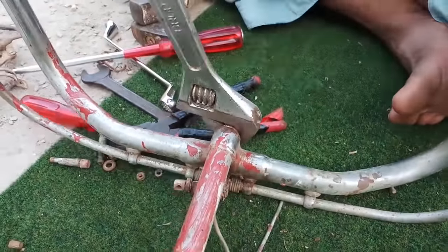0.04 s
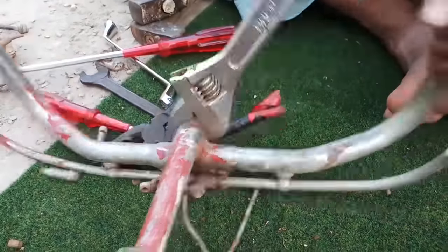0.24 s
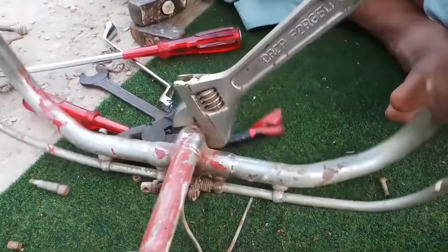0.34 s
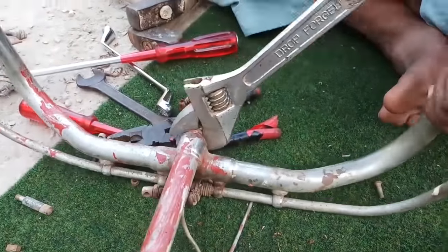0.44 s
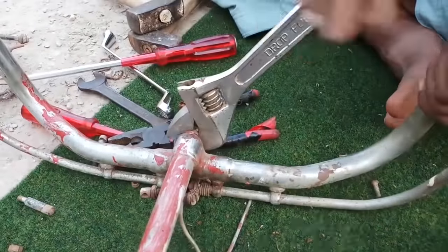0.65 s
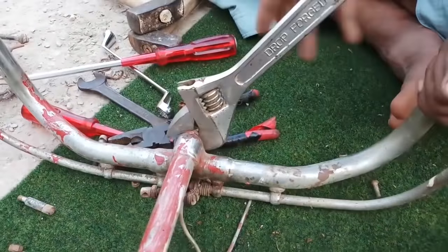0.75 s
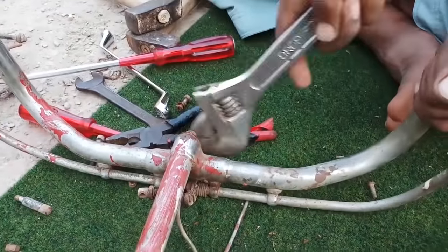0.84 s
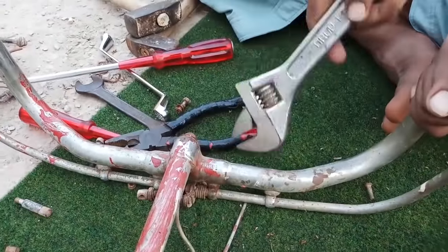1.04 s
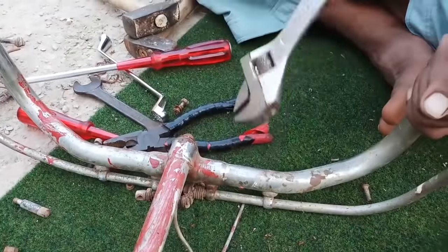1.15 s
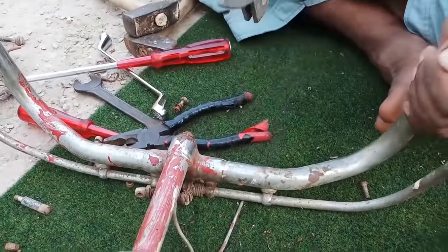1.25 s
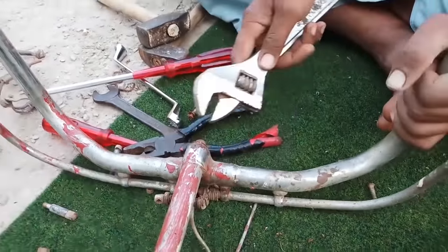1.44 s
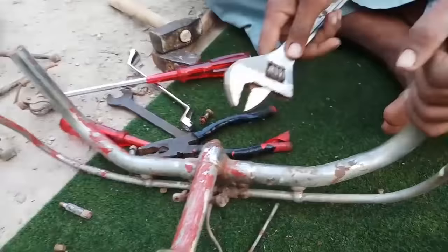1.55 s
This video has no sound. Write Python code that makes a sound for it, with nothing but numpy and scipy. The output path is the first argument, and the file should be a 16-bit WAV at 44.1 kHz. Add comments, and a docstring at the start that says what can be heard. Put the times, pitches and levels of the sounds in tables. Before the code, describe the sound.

Close up outdoors, an adjustable wrench clatters and grinds against a metal bicycle frame, then knocks with a fading buzz. Sharp jaw clicks come next, then a small tick and soft taps as it lifts away.

```python
"""A steel adjustable wrench slips on a bicycle frame lying on the ground, heard close up outdoors.
First the frame thumps on the turf while the wrench clatters, grinds and rings until a hand damps it.
Set back on the tube, the wrench knocks and leaves a fading metallic buzz. Then its loose jaw clicks.
Last, its screw ticks and it is lifted away with a scrape and a few light taps.
A faint low rumble and hiss lie under it all."""
import sys
import numpy as np
from scipy import signal
from scipy.fft import rfft, irfft
from scipy.io import wavfile
from scipy.ndimage import uniform_filter1d, map_coordinates

SR = 44100
rng = np.random.default_rng(int(sys.argv[2]) if len(sys.argv) > 2 else 0)


def generate_wav(sig):
    """Save sig (samples, or channels by samples) to the path in sys.argv[1] as 16-bit PCM at SR."""
    pcm = np.round(np.clip(np.atleast_2d(sig).T, -1, 1) * 32767).astype(np.int16)
    wavfile.write(sys.argv[1], SR, pcm)


N = 70560
TOP_HZ, TILT_TOP_HZ = 15750, 6500  # top of the sound; where a frame hit's tilt levels off
# Below, t60 is the time to fade by 60 dB, and a higher tilt makes a sound brighter.
# tone colour of steel hitting the frame: f/Hz, level/dB
HIT_COLOUR = [(100, -19.5), (380, -6), (750, -4), (1000, 0), (1300, 3.5), (1650, -7.5), (2200, -0.5),
              (2900, -2), (3400, 2), (4000, -3.5), (4800, 2.5), (6000, -0.5), (7200, -6.5), (8200, 0),
              (11000, -7.5), (14500, -6), (16000, -14.5)]


def clatter():
    """Each hit of the wrench gives a crack and a short ping; the frame rings on."""
    # wrench hitting the frame: t/s, level/dB, tilt/(dB per octave), t60/s, ping f/Hz
    hits = [(.2238, -7.5, -6, 0.03, 724), (.2325, -14.5, .5, 0.11, 2213), (.2408, -11.5, 5, 0.031, 5010),
            (.2462, -10.5, 5.5, 0.062, 4680), (.2532, -12.5, 3.5, .024, 10030),
            (.257, -26, -0.9, .19, 4046), (.2992, -19.5, 0, .034, 3300), (.3162, -20.5, 1, .035, 2460),
            (.3268, -27.5, -2, 0.051, 3540), (.3565, -28.5, 1.5, 0.032, 8320),
            (.3605, -16.5, 18, 0.033, 5506), (.3722, -28, 6, 0.022, 8300),
            (0.3775, -25.5, 8.5, 0.022, 6800), (.401, -41, 4, 0.065, 8350), (.4412, -43.5, -5, 0.063, 2090)]
    # the frame's ringing tones: f/Hz, level/dB, t60/s
    frame_tones = [(2144, -9.5, .1), (4251, -2, .07), (4920, -3, .06), (4720, -2.5, .066), (5154, -2, .06),
                   (8299, -0.5, .13), (8723, -7.5, .11)]
    out = np.zeros(N)
    for start, db, tilt, t60, hz in hits:
        ping = tone(hz) * fade(min(0.033, t60)) * rise(0.00034)
        crack = burst(colour(HIT_COLOUR, tilt, TILT_TOP_HZ), t60)
        swell = rise(.00015 * amp(0.91 * (-12 - db)))  # weak, glancing hits start more softly
        add(out, start, amp(db) * swell * (crack + ping))
    add(out, .2412, amp(-19) * ring(frame_tones))
    return out


def clinks():
    """The wrench rings, wavering a little, until the hand damps it, the low tones first."""
    # hits that set it ringing: t/s, level/dB, spot (0 head, 1 handle), time until damped/s
    hits = [(0.253, -16.5, 0.013, .104), (0.3609, -17, 1, 0.03), (1.571, -55, 0.44, .05)]
    # the wrench's own tones: f/Hz, t60/s, level hit on the head/dB, level hit on the handle/dB
    wrench_tones = [(1145, .59, -22, -34.5), (2620, .46, -22, -30.5), (3914, .067, -.5, -30.5),
                    (5495, .37, -2, -5), (6395, .4, -25, -37), (7171, .25, -20.5, -32.5),
                    (8180, .17, -7.5, -28.5), (8875, .2, -16.5, -28), (9470, .24, 0, 0.5),
                    (10060, .24, -10.5, 0.5), (14680, .17, -9.5, -10)]
    out = np.zeros(N)
    for start, db, spot, free_s in hits:
        firm_grip = fade(0.033, after=free_s + 0.068)  # stops every tone
        for hz, t60, head_db, handle_db in wrench_tones:
            gain = amp(db + head_db + spot * (handle_db - head_db))
            damping = fade(0.038 * np.clip(hz / 5500, 1, 1.8) ** 2.6, after=free_s)
            add(out, start, gain * tone(hz) * fade(t60) * waver() * damping * firm_grip)
    return out


def jaw():
    """The loose jaw clicks: a crack, a short ring and a faint after-ring. It is too small to make bass."""
    # jaw clicks: t/s, level/dB, crack tilt/(dB per octave), crack t60/s, f of the spot hit/Hz
    clicks = [(.832, -39.5, -14.5, 0.033, 3460), (.8467, -29, -3.5, 0.01, 7900),
              (.8575, -37.5, 4.5, .05, 10700), (.865, -37.5, -6, 0.15, 3460),
              (.8915, -36, 14.5, .025, 14230), (.9015, -7.5, 1, 0.025, 6000),
              (.9092, -14.5, -1.5, 0.047, 3100), (.925, -31, 3, 0.093, 9650), (.931, -18, 8, 0.027, 5655),
              (0.981, -43, -5.5, 0.079, 3220), (1.0024, -46, 2, .04, 3460)]
    # the jaw's short tones: f/Hz, level/dB, t60/s
    jaw_tones = [(1661, -16, 0.073), (3094, -7, .04), (3220, -13, 0.049), (3446, 4.5, 0.045),
                 (5210, -11.5, 0.042), (5694, -5, .038), (5950, -9.5, 0.026), (6615, -10, 0.0455),
                 (7940, -12.5, .03), (9560, -19.5, .04), (10700, -16.5, 0.038), (14230, -21, .05)]
    # tone colour of the crack: f/Hz, level/dB
    crack_colour = [(150, -29.5), (900, -8), (2000, -6), (3200, 12), (4400, -4), (5700, 5.5), (8000, -2.5),
                    (12000, -2.5), (14500, -7.5), (16000, -24)]
    # faint tones that linger: f/Hz, level/dB, t60/s
    lingering_tones = [(3500, -53.5, 0.39), (6403, -40.5, 0.46), (6800, -32, .18), (7150, -39, .2),
                       (8830, -41, .27)]
    out = np.zeros(N)
    after_ring = ring(lingering_tones)
    for start, db, tilt, t60, spot_hz in clicks:
        crack_db = -5 + .15 * (db + 16.5)  # soft clicks have less crack and more pitch
        crack = amp(crack_db) * burst(colour(crack_colour, tilt), t60)
        add(out, start, amp(db) * (amp(-4) * struck(jaw_tones, spot_hz) + crack + after_ring))
    low_cut = signal.butter(2, 500, "high", fs=SR, output="sos")
    return signal.sosfilt(low_cut, out)


def thump():
    """The frame is shoved against the ground, and the turf soon stops it."""
    # low tones of the frame on the ground: f/Hz, relative level/dB, t60/s
    low_tones = [(66.96, -16, .13), (161, -16, 0.11), (196.26, -24.5, 0.089), (261, -21.5, 0.074)]
    out = np.zeros(N)
    add(out, .2245, 2 * ring(low_tones) * rise(0.0022) * fade(0.026, after=.016))
    return out


def tube():
    """Set back on the tube, the wrench knocks dully and leaves a fading buzz in the frame."""
    # knocks on the tube: t/s, level/dB, t60/s
    knocks = [(0.4694, -39, 0.026), (.478, -36, 0.085), (0.818, -55, .04)]
    # tone colour of a knock: f/Hz, level/dB
    knock_colour = [(80, -20), (330, 17), (550, 6.5), (750, 10.5), (1200, -13), (2050, 20.5), (2600, -11.5),
                    (4200, -5), (8000, -59)]
    # pitches at which the frame buzzes: f/Hz, width/Hz, level/dB
    buzz_peaks = [(312, 100, -8.5), (800, 160, -3), (1490, 200, -1.5), (2020, 600, 3), (2624, 190, -7.5),
                  (3107, 400, 2.5), (3960, 1500, -10), (4350, 170, 3.5), (5360, 260, -3.5), (6300, 200, -4),
                  (6990, 470, -8.5), (8300, 1500, -19.5)]
    out = np.zeros(N)
    for start, db, t60 in knocks:
        add(out, start, amp(db) * burst(colour(knock_colour), t60))
    add(out, .476, amp(-42) * resonant(buzz_peaks) * fade(0.6) * rise(0.011))
    return out


def lifting():
    """The adjusting screw settles with one bright tick, then the wrench lightly taps the frame."""
    # the screw's tones: f/Hz, level/dB
    tick_tones = [(1720, -14), (2218, -16.5), (5640, 4.5), (6563, -4.5), (7772, -2)]
    # tone colour of the screw's crack: f/Hz, level/dB
    tick_colour = [(4200, -23), (5500, -1), (8700, -15), (10000, 4.5), (12400, 1), (15000, -19)]
    # light taps: t/s, level/dB, crack tilt/(dB per octave), crack t60/s, f of the spot hit/Hz
    taps = [(1.5051, -35.5, 6, 0.026, 9800), (1.519, -37.5, -0.5, 0.012, 6300), (1.546, -54, -7, .03, 2060),
            (1.5955, -36, -2, 0.12, 5850)]
    # tones a tap sets ringing: f/Hz, level/dB, t60/s
    tap_tones = [(885, -6, .07), (2045, -2.5, 0.038), (3600, 1.5, 0.029), (3930, 0, 0.054),
                 (4670, -0.5, 0.034), (5870, -5.5, 0.031), (6470, -4, 0.024), (7171, -13.5, .1),
                 (9560, -6.5, 0.04), (10000, -7.5, 0.069)]
    out = np.zeros(N)
    tick_ring = sum(amp(db) * tone(hz) for hz, db in tick_tones) * fade(0.017) * rise(0.00052)
    tick_crack = burst(colour(tick_colour), t60=0.019)
    add(out, 1.362, amp(-29.5) * tick_ring + amp(-30) * tick_crack)
    for start, db, tilt, t60, spot_hz in taps:
        crack = burst(colour(HIT_COLOUR, tilt, TILT_TOP_HZ), t60)
        add(out, start, amp(db) * (amp(-1.5) * struck(tap_tones, spot_hz) + amp(-3) * crack))
    return out


def rubbing():
    """The frame shifts on the turf; the wrench grinds along the tube and later scrapes off it."""
    # loudness of the shifting frame: t/s, level/dB
    rub_levels = [(0, -46.5), (.04, -41.5), (.095, -36.5), (.16, -42.5), (.22, -43), (.3, -42),
                  (.35, -43.5), (.4, -66.5)]
    # its tone colour: f/Hz, level/dB
    rub_colour = [(30, -34), (75, -21), (136, -2), (274, -10), (346, -6.5), (384, -16.5), (905, -24.5),
                  (1440, -24.5), (5580, -56.5), (15000, -78.5)]
    # loudness of the grinding: t/s, level/dB
    grind_levels = [(.29, -70), (.3, -33), (.333, -34.5), (.36, -53), (.44, -66.5), (.48, -91.5)]
    # its strongest pitches: f/Hz, width/Hz, level/dB
    grind_peaks = [(830, 490, -0.5), (1150, 130, -0.5), (1710, 300, -3), (2470, 570, -2), (3400, 400, 1.5)]
    # loudness of the last scrape: t/s, level/dB
    scrape_levels = [(1.49, -98), (1.505, -57), (1.535, -64.5), (1.552, -53), (1.6, -52.5)]
    # its strongest pitches: f/Hz, width/Hz, level/dB
    scrape_peaks = [(880, 60, 0.5), (963.6, 40, -5), (1140, 31, 3), (2102, 600, -14), (5490, 8000, -20.5)]
    rub = level(rub_levels) * noise(rub_colour)
    grind = level(grind_levels) * resonant(grind_peaks)
    scrape = level(scrape_levels) * resonant(scrape_peaks)
    return rub + grind + scrape


def yard(x):
    """Short echoes from the surroundings, dull because the turf swallows their treble."""
    tail = rng.standard_normal(N) * fade(0.39) * rise(.005)
    dull = signal.butter(2, 4500, fs=SR, output="sos")
    return signal.fftconvolve(x, signal.sosfilt(dull, tail / np.linalg.norm(tail)))[:N]


def background():
    """Low outdoor rumble, a hiss that comes and goes, and two faint passing tones."""
    # tone colour of the rumble: f/Hz, level/dB
    rumble_colour = [(25, -26), (181, -4), (383, -22), (450, -13.5), (790, -26), (978, -17.5),
                     (1120, -45.5), (3350, -45), (5420, -51), (6540, -42), (15000, -79)]
    # loudness of the hiss: t/s, level/dB
    hiss_levels = [(0, -66.5), (.2, -80.5), (.8, -73.5), (.88, -54.5), (.95, -53.5), (1.04, -89.5),
                   (1.2, -82), (1.28, -72.5), (1.4, -64), (1.6, -75)]
    # its tone colour: f/Hz, level/dB
    hiss_colour = [(300, -4), (1000, 5), (2000, -0.5), (3500, -0.5), (7000, -6), (13500, -6.5),
                   (15000, -26.5)]
    # passing tones: middle t/s, f/Hz, level/dB, half length/s
    faint_tones = [(1.178, 958, -67, 0.06), (1.261, 1866, -73.5, 0.06)]
    tones = sum(amp(db) * tone(hz) * np.exp(-((clock() - middle) / half) ** 2)
                for middle, hz, db, half in faint_tones)
    return amp(-61) * noise(rumble_colour) + level(hiss_levels) * noise(hiss_colour) + tones


def burst(gain, t60):
    """A hard hit: a snap at the moment of contact, then a dense spread of pitches fading together."""
    snap = amp(1) * fade(0.0078)
    spectrum = rfft(rng.standard_normal(N) * (fade(t60) + snap))
    local_power = np.abs(uniform_filter1d(np.abs(spectrum) ** 2, size=900))
    even = spectrum / np.sqrt(local_power + 1e-12)
    x = irfft(even * gain, N) * rise(.0001) * (clock() < 3 * t60)
    return x * np.linalg.norm(fade(t60)) / np.linalg.norm(x)


def ring(tones):
    """Fading tones from rows of f/Hz, level/dB, t60/s."""
    return sum(amp(db) * tone(hz) * fade(t60) for hz, db, t60 in tones)


def struck(tones, spot_hz):
    """A ring that varies with each hit; tones near the pitch of the spot hit are louder."""
    hz, db, t60 = np.transpose(tones)
    boost_db = 10 * np.exp(-(np.log2(hz / spot_hz) / 0.14) ** 2)
    gains = amp(db + boost_db + rng.normal(0, 1, len(hz))) * rng.choice([-1, 1], len(hz))
    ringing = sum(g * tone(f) * fade(t) for g, f, t in zip(gains, hz, t60))
    return ringing * np.sqrt(2) / np.linalg.norm(gains)


def waver():
    """Grip and rubbing make a ring waver: a gain that wanders around one."""
    steps_per_s = 110
    steps = rng.standard_normal(int(N * steps_per_s / SR) + 4)
    return 1 + .13 * map_coordinates(steps, [clock() * steps_per_s])


def colour(points, tilt=0, top_hz=TOP_HZ):
    """Gain per frequency from f/Hz, level/dB points, tilted between 700 Hz and top_hz."""
    octave = np.log2(np.fft.rfftfreq(N, 1 / SR) + 1)
    hz, db = np.transpose(points)
    slope = tilt * np.clip(octave, np.log2(700), np.log2(top_hz))
    return amp(np.interp(octave, np.log2(hz), db) + slope)


def noise(points):
    """Noise of strength 1 with the given tone colour."""
    return unit(irfft(rfft(rng.standard_normal(N)) * colour(points), N))


def resonant(peaks):
    """Noise of strength 1 gathered around a few pitches."""
    f = np.fft.rfftfreq(N, 1 / SR)
    gain = sum(amp(db) / (1 + (2 * (f - hz) / width) ** 2) for hz, width, db in peaks)
    return unit(irfft(rfft(rng.standard_normal(N)) * gain / gain.max(), N))


def tone(hz):
    """A pure tone."""
    return np.sin(2 * np.pi * hz * clock())


def fade(t60, after=0):
    """Hold for `after` seconds, then fall by 60 dB every t60 seconds."""
    return np.exp(-np.log(1000) * np.maximum(clock() - after, 0) / max(t60, 1e-3))


def rise(seconds):
    """Soft start from time zero."""
    return 1 - np.exp(-clock() / seconds)


def level(points):
    """Gain curve through t/s, level/dB points."""
    return amp(np.interp(clock(), *np.transpose(points)))


def amp(db):
    """Decibels to gain."""
    return 10 ** (np.asarray(db) / 20)


def unit(x):
    """Scale x to an average strength (rms) of 1."""
    return x / np.sqrt(np.mean(x ** 2) + 1e-20)


def clock():
    """Time of every sample in seconds."""
    return np.arange(N) / SR


def add(out, start, x):
    """Mix x into out from `start` seconds on."""
    i = max(0, round(start * SR))
    out[i:] += x[:max(0, N - i)]


def scene():
    """All sources in one channel; the metal sounds get a weak echo."""
    metal = clatter() + clinks() + jaw() + tube() + lifting()
    return (metal + amp(-36.5) * yard(metal) + thump() + rubbing() + background())[None]


def record(dry):
    """Round off the loudest peaks and cut the highest treble."""
    rounded = dry / (1 + dry ** 6) ** (1 / 6)
    high_cut = signal.ellip(12, .1, 90, TOP_HZ, fs=SR, output="sos")
    return signal.sosfilt(high_cut, rounded)


dry = scene()
out = record(dry)
generate_wav(out)
```